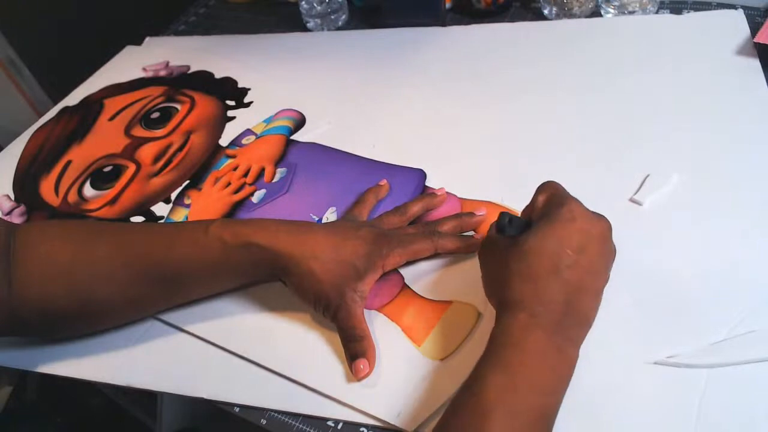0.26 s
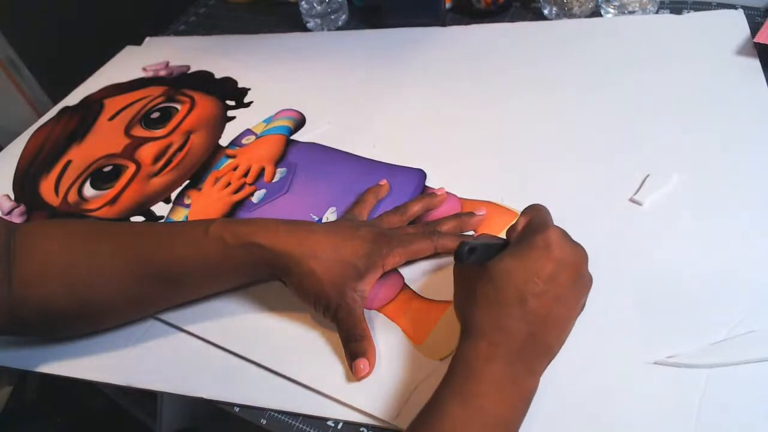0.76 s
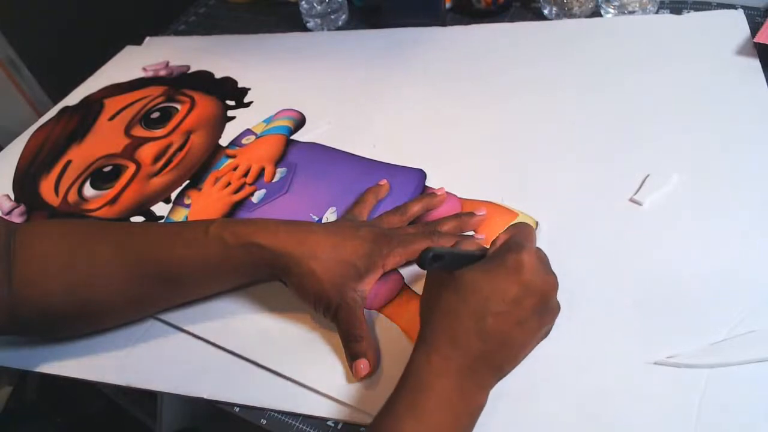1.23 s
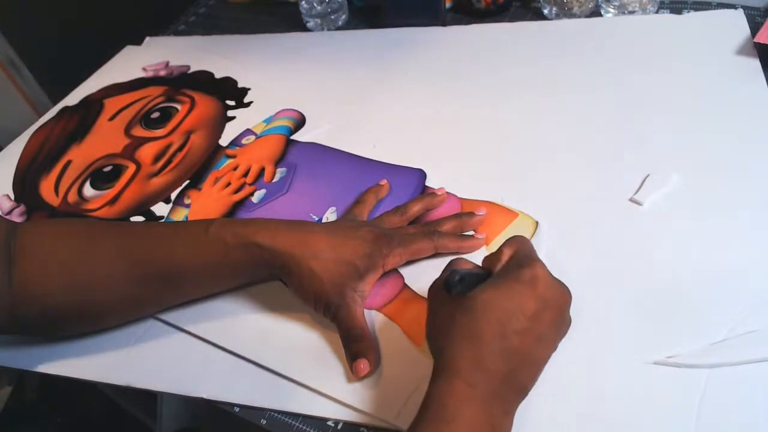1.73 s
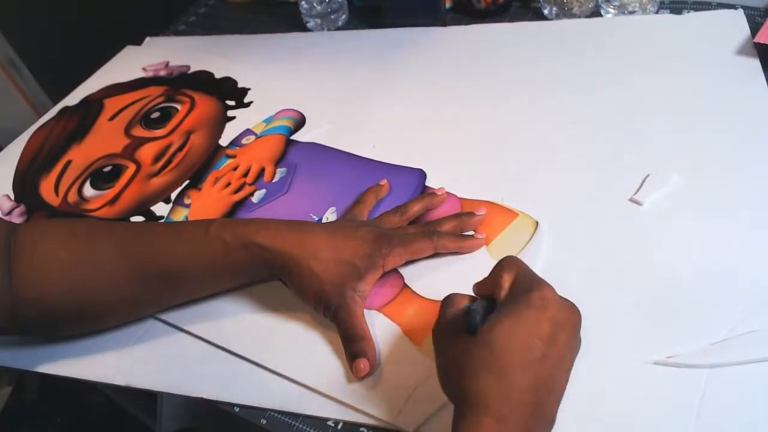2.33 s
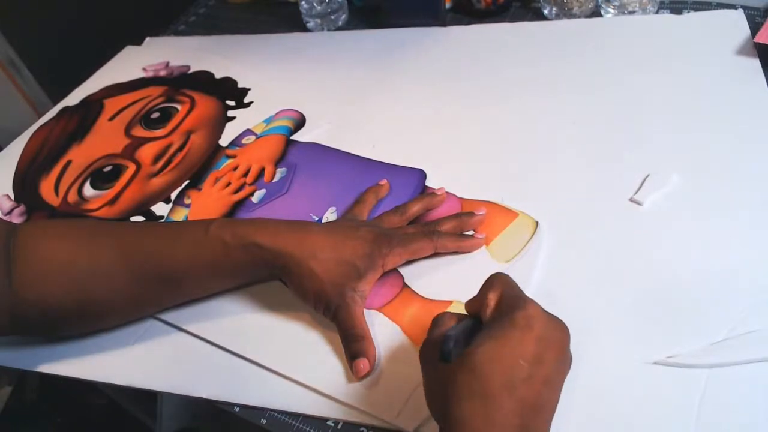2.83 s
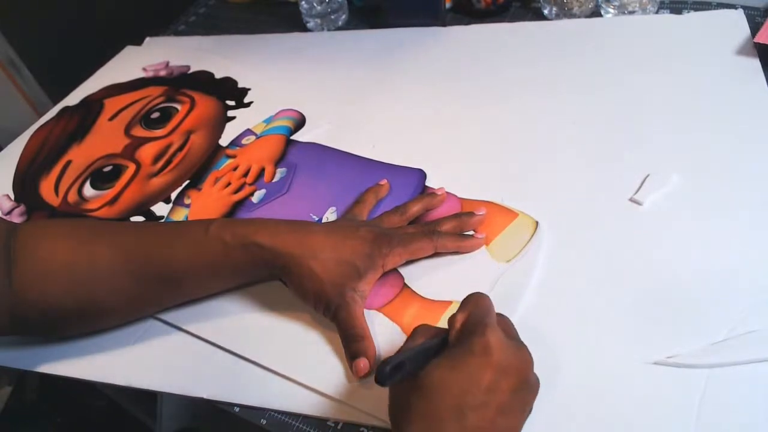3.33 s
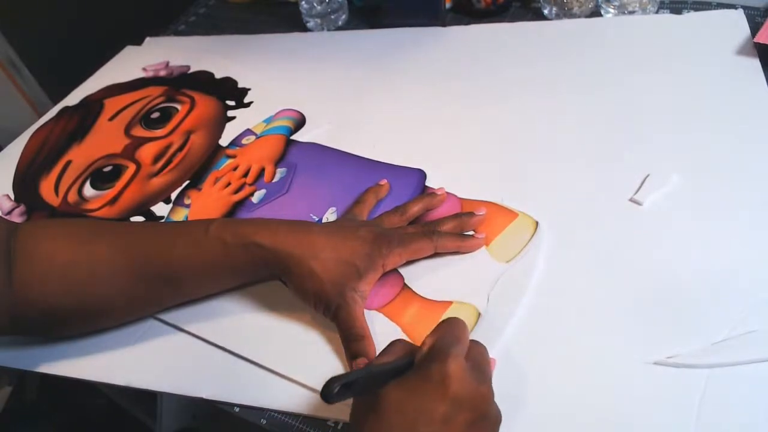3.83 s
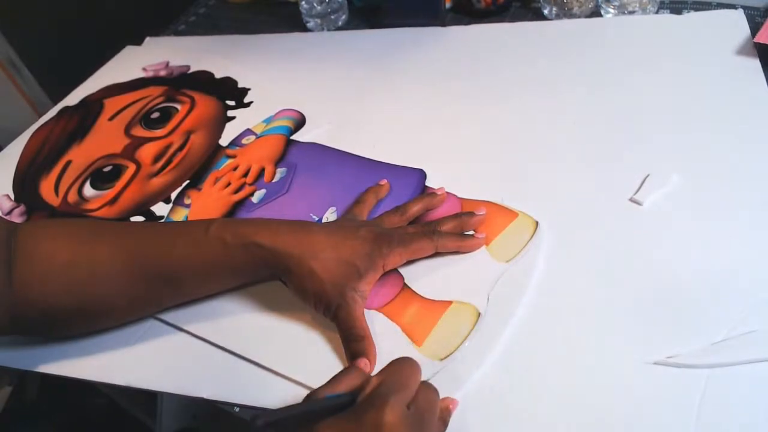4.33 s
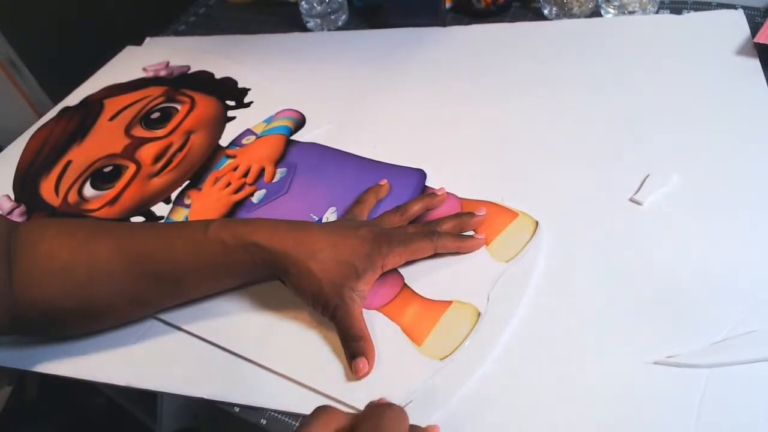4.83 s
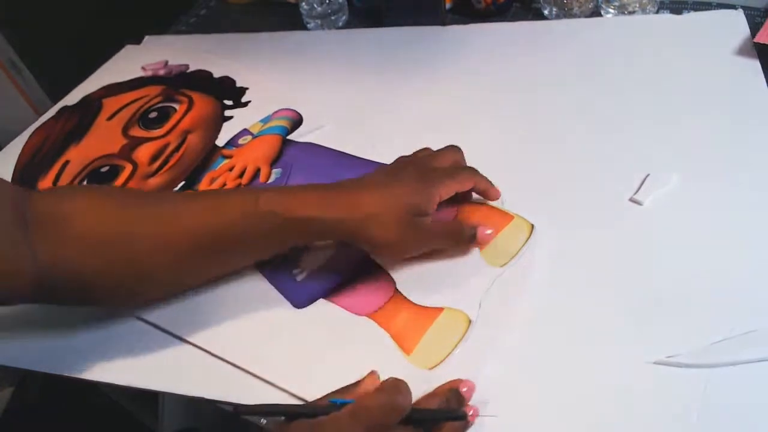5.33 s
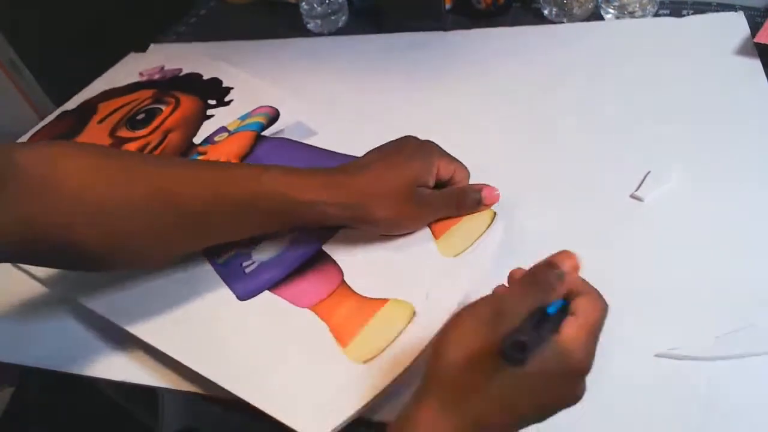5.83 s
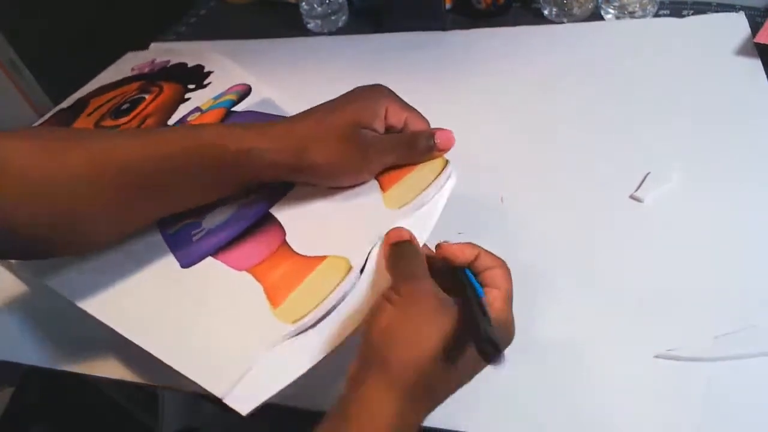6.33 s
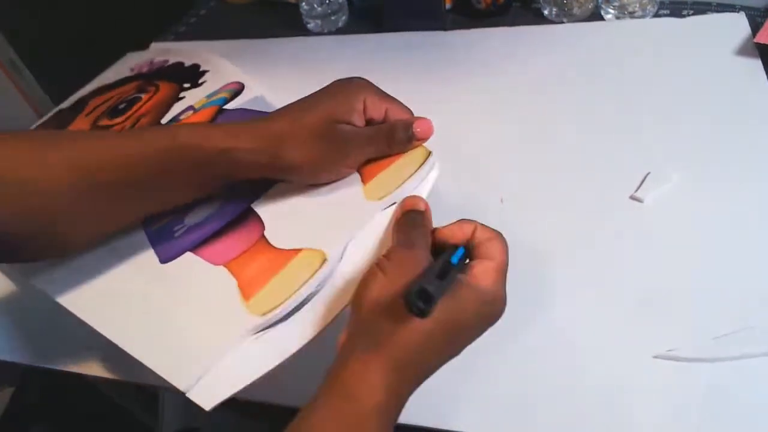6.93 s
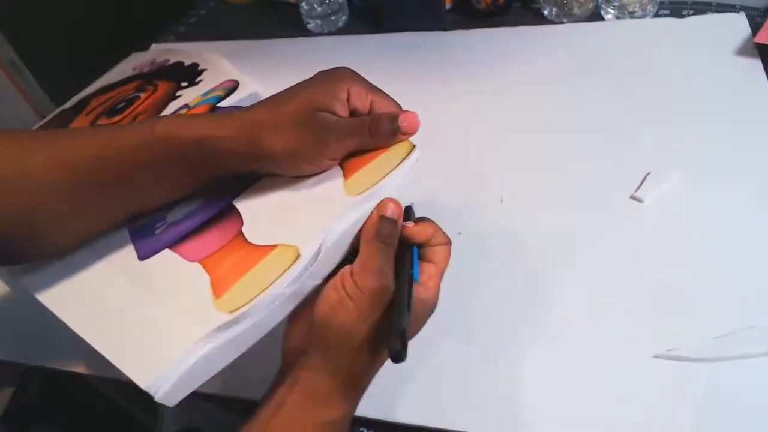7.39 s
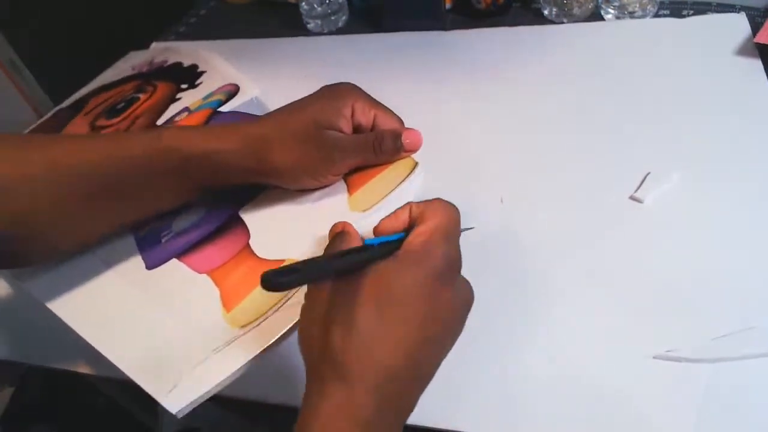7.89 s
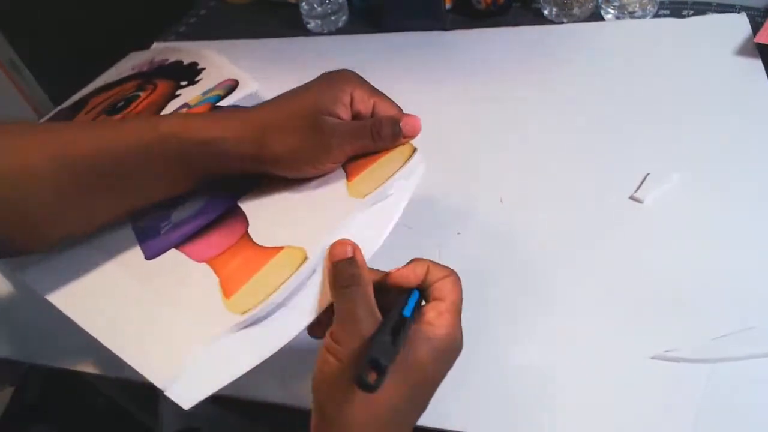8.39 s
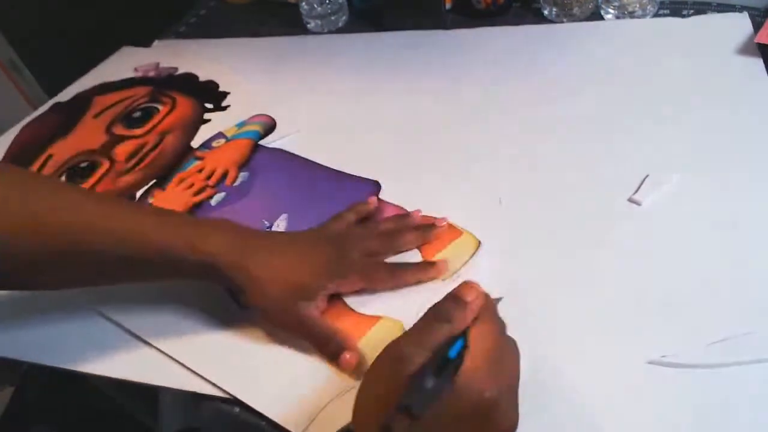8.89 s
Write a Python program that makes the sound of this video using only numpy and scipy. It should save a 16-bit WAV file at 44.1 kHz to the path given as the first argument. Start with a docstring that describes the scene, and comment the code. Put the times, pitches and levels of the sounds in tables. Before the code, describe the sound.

Five soft pulls of a blade rasp dryly through board on a table, slightly squeaky, with bright hiss and two snaps. Then handling takes over: a quick stuttering creak, clustered snaps, short scratchy rubs and hollow knocks, with quiet gaps between. Low muffled booms come from the sheet. The strongest crack arrives late, as the piece tears, before a quieter thump. Close, dry single microphone, with very faint hiss and low room murmur.

```python
"""Cutting foam board with a craft knife

A blade is drawn through foam board on a table in a quiet room, close to a single microphone.
It rasps and hisses; the paper skin snaps; the loose piece creaks, rubs and thumps as it is pulled free.
Filtered, uneven noise makes the rasps, hisses, snaps and creaks; sine waves make the soft booms and a short ring.
"""
import sys
import numpy as np
from scipy import signal
from scipy.fft import rfft, irfft, next_fast_len
from scipy.io import wavfile
from scipy.ndimage import uniform_filter1d, map_coordinates

SR = 44100
rng = np.random.default_rng(int(sys.argv[2]) if len(sys.argv) > 2 else 0)


def store_pcm(level_fs):
    """Save levels as 16-bit WAV."""
    pcm = np.round(np.clip(level_fs, -1, 1) * 32767).astype(np.int16)
    wavfile.write(sys.argv[1], SR, np.atleast_2d(pcm).T)


N = 403515
T = np.arange(N) / SR  # time in seconds
CUT_ENDS = 4.88  # seconds; after this the piece is worked loose by hand


def amp(db):
    """Turn decibels into a plain multiplier."""
    return 10 ** (np.asarray(db) / 20)


def unit(x):
    """Scale x to an rms of 1."""
    return x / np.sqrt(np.mean(x ** 2) + 1e-20)


def coloured(x, points):
    """Filter x to follow (Hz, dB) points, without looking ahead; white noise of rms 1 keeps rms 1."""
    f, v = np.transpose(points)
    hz = np.fft.rfftfreq(4096, 1 / SR)
    gain = amp(np.interp(np.log(hz + 1), np.log(f), v, left=-80)) + 1e-4
    # Folding the cepstrum gives a minimum-phase filter, which acts as early as it can.
    cepstrum = irfft(np.log(gain))
    cepstrum[1:len(cepstrum) // 2] *= 2
    cepstrum[len(cepstrum) // 2 + 1:] = 0
    response = irfft(np.exp(rfft(cepstrum)))
    return signal.fftconvolve(x, response / np.linalg.norm(response))[:len(x)]


def resonant(x, peaks):
    """Ring x in (Hz, width Hz, dB) resonances, each at that level for white noise of rms 1."""
    total = 0
    for hz, width, db in peaks:
        b, a = signal.iirpeak(hz, hz / width, SR)
        total = total + amp(db) * signal.lfilter(b, a, x) * np.sqrt(SR / np.pi / width)
    return total


def patchy(patchy_db, grain_db, wander_db=0):
    """Noise of rms 1: narrow bands swell and fade, broad bands wander, grains are of uneven size."""
    spectrum = signal.stft(rng.standard_normal(N + 2048), nperseg=1024)[2]
    chance = rng.standard_normal((2, *spectrum.shape))
    # Smooth over frequency (axis 0), then over time (axis 1).
    narrow = uniform_filter1d(uniform_filter1d(chance[0], size=2, axis=0), size=8, axis=1)
    broad = uniform_filter1d(uniform_filter1d(chance[1], size=12, axis=0), size=14, axis=1)
    gain = amp(patchy_db * unit(narrow) + wander_db * unit(broad))
    noise = signal.istft(spectrum * gain, nperseg=1024)[1][:N]
    grains = unit(uniform_filter1d(rng.standard_normal(N), size=60))
    return unit(noise * amp(grain_db * grains))


# Colour of the microphone's hiss. Each row: frequency in Hz, relative level in dB per Hz.
HUSH_COLOUR = [(710, -37), (1200, -7.5), (2530, -8.5), (7660, -15), (12500, -4), (16000, -14)]


def microphone_hiss():
    """The microphone adds a faint, steady noise of its own."""
    return amp(-78.5) * coloured(patchy(patchy_db=0.0, grain_db=-0.5), HUSH_COLOUR)


# Colour of the flexing board. Each row: frequency in Hz, relative level in dB per Hz.
FLEX_COLOUR = [(30, -27), (85, -15.5), (120, -4), (315, -7), (526, -9.5), (900, -10), (1430, -23),
               (2420, -61.5)]
# How strongly the board flexes, over the room's murmur. Each row: time in seconds, level in dB.
FLEX_LEVELS = [(0, -72.5), (.3, -69), (2.3, -71.5), (4.87, -69), (5.6, -60), (5.81, -67), (7.26, -73),
               (7.55, -70.5), (8.35, -68.5), (9.0, -66.5), (9.15, -54)]


def flexing():
    """The board flexing under the hands is low noise, over the murmur of the room."""
    flex = coloured(patchy(patchy_db=3.0, grain_db=1.5, wander_db=1.5), FLEX_COLOUR)
    return amp(np.interp(T, *np.transpose(FLEX_LEVELS))) * flex


# Soft pushes of the hands on the sheet. Each row: middle in seconds, peak level in dB, pitch in Hz.
HAND_PUSHES = [(1.65, -57, 96), (3.451, -59.5, 118), (3.84, -51, 120), (5.421, -46.5, 122),
               (5.501, -46.5, 126), (6.226, -39, 240.7), (7.096, -40.5, 165), (7.137, -40, 338),
               (8.609, -40.5, 159), (8.658, -42.5, 187), (8.743, -46, 164)]


def pushes():
    """Each push sets the sheet booming: a short sine wave that swells and fades smoothly."""
    push_s = 0.013  # seconds, half-width of a push
    boom = np.zeros(N)
    t = T[:SR // 4] - 1 / 8  # zero at the middle of the push
    swell = np.exp(-(t / push_s) ** 2 / 2)
    for s, db, hz in HAND_PUSHES:
        tone = np.sin(2 * np.pi * (hz * t + rng.random()))
        boom[round((s + t[0]) * SR):][:len(t)] += amp(db) * swell * tone
    return boom


# Colour of cracking paper skin. Each row: multiple of the centre frequency, relative level in dB per Hz.
CRACK_COLOUR = [(.35, -21.5), (.7, 12.5), (1.01, 0.9), (1.5, -2.5), (2.4, -28.5)]


def cracked(x, centre_hz):
    """Cracking paper skin gives x a colour gathered around a centre frequency."""
    return coloured(x, np.multiply(CRACK_COLOUR, [centre_hz, 1]))


# Colour of cut edges rubbing. Each row: frequency in Hz, relative level in dB per Hz.
RUB_HISS_COLOUR = [(2470, -30), (4200, -20.5), (5470, -6), (6240, 1), (7000, 1), (8120, -6), (10800, -7.5),
                   (12500, -13.5), (15600, -17.5)]


def edge_hiss(x):
    """Cut edges rubbing together turn x into a bright hiss."""
    return coloured(x, RUB_HISS_COLOUR)


# Colour of the board's hollow knock. Each row: frequency in Hz, relative level in dB per Hz.
KNOCK_COLOUR = [(260, -14), (450, -10.5), (715, -4.5), (906, -6), (1500, 1.5), (1950, -29), (3300, -120)]


def hollow_knock(x):
    """The board answers x with a hollow knock."""
    return coloured(x, KNOCK_COLOUR)


# Resonances of the board. Each row: frequency in Hz, width in Hz, relative level in dB.
BOARD_RESONANCES = [(748, 100, -1), (1410, 80, -4), (1750, 110, -3), (2350, 250, -3), (3280, 160, -2)]


def board_ring(x):
    """The board rings at its own resonances when x shakes it."""
    return resonant(x, BOARD_RESONANCES)


# Slips of the creaking edges. Each row: time in seconds, relative level in dB.
SLIPS = [(4.917, -34), (4.923, -17.5), (4.9369, -21.5), (4.9647, -22), (4.9874, -23), (5.0067, -23),
         (5.023, -24.5), (5.0373, -24.5), (5.052, -30), (5.065, -35)]


def creak():
    """The edges stick and let go; each slip is a sharp click with a short tail that rings the board."""
    slips = np.zeros(N)
    t = T[:SR // 4]
    # The click falls 60 dB in 0.008 s, its tail in 0.14 s.
    click = 0.4 * amp(-60 * t / 0.008) + 0.13 * amp(-60 * t / 0.14)
    for s, db in SLIPS:
        slips[round(s * SR):][:len(t)] += amp(db) * click
    fibres = slips * rng.standard_normal(N)
    body = amp(-1) * hollow_knock(fibres) + amp(-3) * board_ring(fibres)
    return amp(-2.5) * cracked(fibres, centre_hz=2985) + body + amp(-5.5) * edge_hiss(fibres)


# Ringing of the freed piece as it tears off.
# Each row: frequency in Hz, relative level in dB, time to fall 60 dB in seconds.
PIECE_RINGING = [(3860, 4, 0.18)]


def piece():
    """The freed piece rings as it comes loose: a sine wave that rises quickly and dies away."""
    t = np.clip(T - 8.59, 0, 1)  # seconds since it came loose
    ring = sum(amp(db - 60 * t / t60) * np.sin(2 * np.pi * hz * t) for hz, db, t60 in PIECE_RINGING)
    return amp(-23.0) * (1 - np.exp(-t / 0.0032)) * ring


# Resonances of the slit between the edges. Each row: frequency in Hz, width in Hz, relative level in dB.
SLIT_RESONANCES = [(6250, 260, -8), (7000, 400, -14)]
# Fingers and cut edges rubbing. Each row: start in seconds, length in seconds, relative level at the
# end of the rub in dB, swell over the length in dB, hiss against rasp in dB, rasp centre in Hz.
RUB_EVENTS = [(5.218, 0.46, -62.5, -0.5, 3.5, 3150), (5.358, 0.054, -39.5, 10, -4, 2070),
              (5.485, 0.069, -52, -10, -2.5, 2310), (5.824, 0.27, -75.5, -6, -6, 2550),
              (6.004, 0.14, -73, -15, 8, 2280), (6.168, 0.026, -54, 4, -8.5, 2515),
              (6.252, 0.057, -52.5, -1.5, 11.5, 2306), (6.442, 0.089, -74.5, 1.5, 6.5, 2000),
              (6.744, .08, -56, 14, 6, 2830), (7.22, 0.059, -60.5, -2.5, -3.5, 1950),
              (7.298, 0.033, -33.5, 2.5, -3, 2650), (7.365, 0.024, -38.5, 5.5, 5, 2510),
              (7.528, 0.125, -67.5, 1.5, -5, 3920), (7.728, 0.062, -80.5, -1.5, 4.5, 3020),
              (8.232, 0.039, -70.5, -7.5, -41.5, 4240), (8.47, 0.07, -61, 10.5, -12, 3010),
              (8.558, 0.018, -37.5, 12.5, -5.5, 3340), (8.648, 0.085, -40.5, 7, -6.5, 1767),
              (8.933, 0.033, -63.5, 3, -5.5, 2410)]


def rubbing():
    """Each rub starts fast, changes level and falls away; it rasps, shakes the board and hisses in the slit."""
    rise, fall = 1200, 364  # dB per second before and after a rub
    gap_grows = 0.6  # extra dB in the slit for each dB of hiss over rasp
    held_db = -82  # faint rustle while the hands hold the loose piece
    grit = patchy(patchy_db=4, grain_db=1.5, wander_db=2.5)
    rasp, shake, hiss, slit = np.zeros((4, N))
    for s, length, db, swell_db, hiss_db, rasp_hz in RUB_EVENTS:
        span = slice(round(s * SR) - SR // 10, round(s * SR) + SR // 2)
        t = T[span] - s
        left = np.clip(1 - t / length, 0, 1)  # share of the rub still to come
        slopes = rise * np.clip(-t, 0, 1) + fall * np.clip(t - length, 0, 1)
        rub = amp(db - swell_db * left - slopes) * grit[span]
        rasp[span] += cracked(rub, rasp_hz) + resonant(rub, [(0.7 * rasp_hz, 130, -5)])
        shake[span] += rub
        hiss[span] += rub * amp(hiss_db)
        slit[span] += rub * amp((1 + gap_grows) * hiss_db - 7)
    held = amp(held_db) * (T > CUT_ENDS) * grit
    rasp = rasp + amp(-1.0) * cracked(held, centre_hz=1690)
    return rasp + amp(-7) * hollow_knock(shake) + edge_hiss(hiss + held) + resonant(slit, SLIT_RESONANCES)


# Colour of the foam parting. Each row: frequency in Hz, relative level in dB per Hz.
CUT_HISS_COLOUR = [(2470, -34), (4200, -8), (6100, -1.5), (7680, -3.5), (8120, 0.5), (9470, -0.5),
                   (15600, -6.5)]


def foam_hiss(x):
    """Foam parting turns x into a wide, bright hiss."""
    return coloured(x, CUT_HISS_COLOUR)


# Colour of the whole sheet thudding on the table. Each row: frequency in Hz, relative level in dB per Hz.
THUD_COLOUR = [(28, -27), (59, -18), (151, 3), (233, -3), (450, -12.5), (700, -60.5)]
# Snaps and knocks. Each row: start in seconds, burst level in dB, then hiss, knock and thud against
# the burst in dB, crack centre in Hz, time scale of the decay in seconds.
SNAP_EVENTS = [(0.032, -60, -31, -2, -20, 2900, 0.16), (1.1799, -21, -2.5, -3.5, -48, 3260, 0.14),
               (3.804, -30.5, 0, -10.5, -40, 2310, 0.158), (5.135, -26.5, -6.5, -2.5, -29, 2440, 0.15),
               (5.5633, -20.5, -2.5, -4.5, -56, 3280, 0.15), (5.6384, -42.5, -5.5, 2, -35, 2240, 0.21),
               (5.7123, -31, 2, -6, -14, 2450, 0.14), (5.7434, -41, -12.5, 6.5, -42, 2280, 0.17),
               (6.2, -25.5, 8, 8.5, -15.5, 2760, 0.16), (6.528, -46, 3, 8.5, -2.5, 2090, 0.14),
               (7.0614, -46, -10, 2, -1.5, 2370, 0.43), (8.5687, -15.5, -1, -19, -29, 3337, 0.28),
               (8.7216, -29.5, -15.5, -4, -28.5, 1990, 0.15),
               (9.1098, -42.5, -2.5, -16.5, -0.5, 3850, 0.51)]


def snaps():
    """Each snap is a burst of tearing fibres whose level falls faster and faster; the whole sheet thuds."""
    rise_share = 0.027  # rise of a snap, as a share of its decay time scale
    crack, bright, knock, thud = np.zeros((4, N + SR))  # one spare second for the last tail
    fibres = np.pad(patchy(patchy_db=3.0, grain_db=0.5), (0, SR))
    t = T[:SR // 2]
    for s, db, hiss_db, knock_db, thud_db, crack_hz, decay_s in SNAP_EVENTS:
        span = slice(round(s * SR), round(s * SR) + len(t))
        age = t / max(decay_s, .02)
        rise = (1 - np.exp(-age / rise_share)) ** 2
        burst = rise * amp(db - 51.7 * age - 20 * age ** 2) * fibres[span]
        crack[span] += cracked(burst, crack_hz) + resonant(burst, [(crack_hz, 250, -7)])
        bright[span] += burst * amp(hiss_db)
        knock[span] += burst * amp(knock_db)
        thud_rise = (1 - np.exp(-age / 0.0055)) ** 2
        thud[span] += thud_rise * amp(db + thud_db - 10 * age - 17 * age ** 2)
    # The hiss is that of parting foam during the cut, and of rubbing edges afterwards.
    hiss = np.where(T < CUT_ENDS, foam_hiss(bright[:N]), edge_hiss(bright[:N]))
    sheet = thud[:N] * coloured(patchy(patchy_db=-5.5, grain_db=5.0), THUD_COLOUR)
    body = hollow_knock(knock[:N]) + amp(-15.5) * board_ring(knock[:N])
    return crack[:N] + body + hiss + sheet


# Resonances of the blade in its cut. Each row: frequency in Hz, width in Hz, relative level in dB.
BLADE_RESONANCES = [(2106, 63, -3), (2372, 86, -3.5), (2570, 61, -3.5), (2850, 65, -6.5), (3370, 15, -13),
                    (4150, 60, -17.5), (5200, 83, -14)]


def squeaks(grit):
    """Every resonance of the blade comes and goes by itself, about ten times a second."""
    squeak_db = 4  # size of the swelling and fading
    knots = rng.standard_normal((len(BLADE_RESONANCES), int(10 * T[-1]) + 4))
    total = 0
    for row, peak in zip(knots, BLADE_RESONANCES):
        swell = amp(squeak_db * map_coordinates(row, [10 * T]))  # a smooth curve through the knots
        total = total + swell * resonant(grit, [peak])
    return total


# Colour of the blade's rasp. Each row: frequency in Hz, relative level in dB per Hz.
RASP_COLOUR = [(760, -18.5), (1300, -13.5), (1990, -9.5), (2340, -5.5), (2750, -7.5), (3580, -15),
               (4500, -16), (5850, -39)]
# Pressure on the blade, one table for each pull of the knife.
# Each row: time in seconds, relative rasp level in dB, hiss against rasp in dB.
KNIFE_PULLS = [
    [(0.2, -112.5, 13), (0.244, -72, 16), (0.36, -80, 13), (0.466, -67, 2.5), (0.76, -66, 5.5),
     (0.9, -58.5, -1), (1.0, -77, 1), (1.17, -65, 2)],
    [(1.28, -54.5, -5.5), (2.136, -53.5, 1.5), (2.22, -100.5, -1)],
    [(2.33, -103, -11.5), (2.428, -52, 0), (2.534, -69, 4), (2.62, -83, -7.5), (2.76, -67.5, -1),
     (2.9, -72, -1), (3.078, -57.5, -0.5), (3.22, -78.5, -11.5)],
    [(3.24, -75.5, -3), (3.36, -65.5, 0), (3.46, -66.5, 3), (3.58, -57, 1.5), (3.78, -66, 2.5)],
    [(3.9, -64, 10.5), (3.958, -78.5, 10), (4.366, -49.5, 9.5), (4.528, -52, 6), (4.76, -68.5, 19.5),
     (4.86, -97.5, 18.5)],
]


def stroke():
    """The moving blade rasps and squeaks in its cut while the parting foam hisses."""
    s, rasp_db, hiss_db = np.concatenate(KNIFE_PULLS).T
    blade = amp(np.interp(T, s, rasp_db, left=-120, right=-120))
    foam = amp(np.interp(T, s, rasp_db + hiss_db, left=-120, right=-120))
    grit = patchy(patchy_db=3.5, grain_db=1, wander_db=0.5)
    rasp = blade * (0.59 * coloured(grit, RASP_COLOUR) + 0.42 * squeaks(grit))
    hiss = foam * foam_hiss(patchy(patchy_db=4.0, grain_db=1.0))
    return rasp + hiss


def scene():
    """Add all the sounds together and send the same mix to both channels."""
    background = microphone_hiss() + flexing() + pushes()
    mono = background + creak() + piece() + rubbing() + snaps() + stroke()
    return np.array([mono, mono])


def record(dry):
    """The recorder keeps nothing above its band limit."""
    top_hz = 15900
    m = next_fast_len(N + SR // 2)
    kept = np.fft.rfftfreq(m, 1 / SR) < top_hz
    return irfft(rfft(dry, m) * kept, m)[:, :N]


dry = scene()
out = record(dry)
store_pcm(out)
```